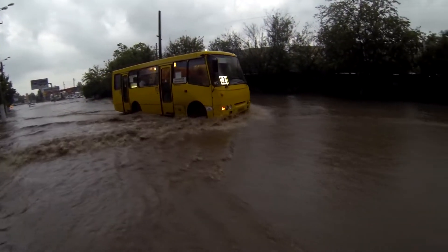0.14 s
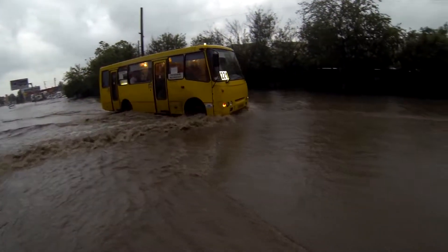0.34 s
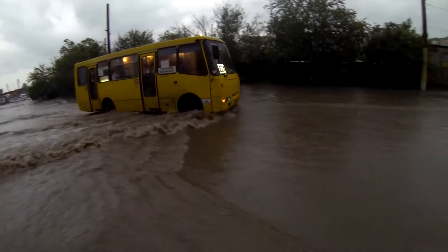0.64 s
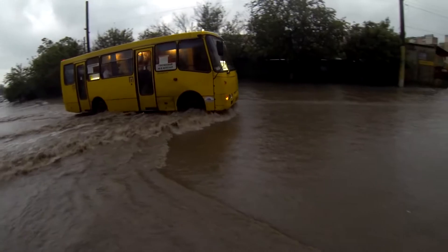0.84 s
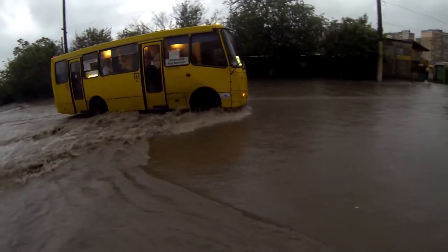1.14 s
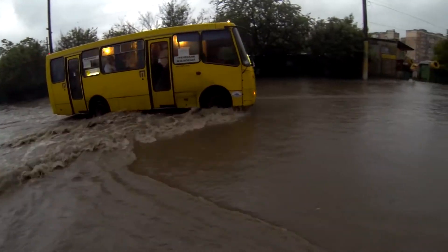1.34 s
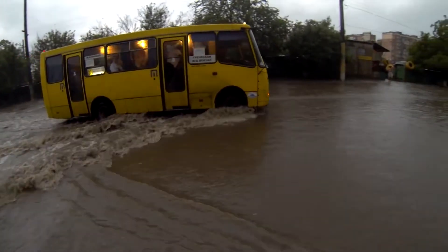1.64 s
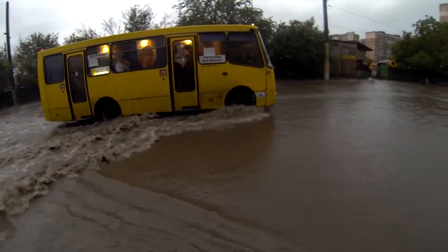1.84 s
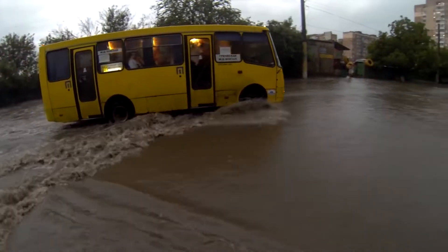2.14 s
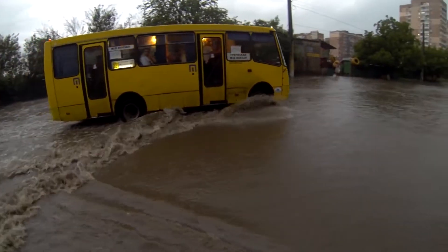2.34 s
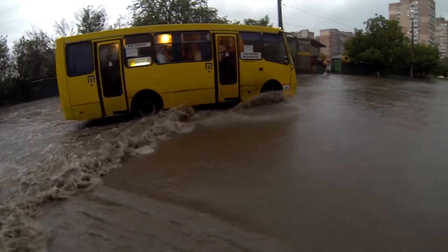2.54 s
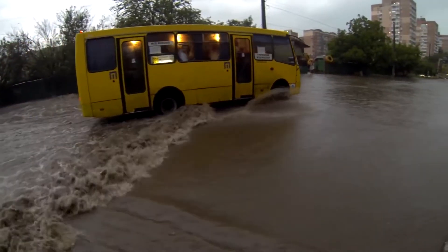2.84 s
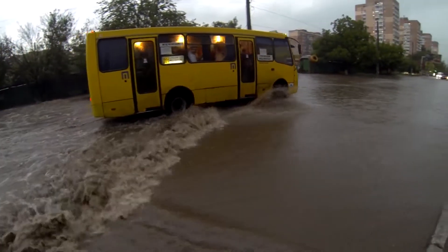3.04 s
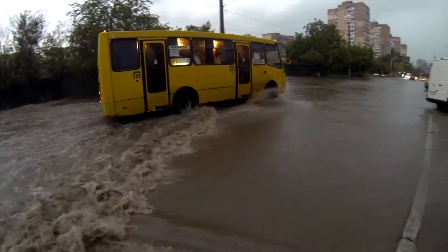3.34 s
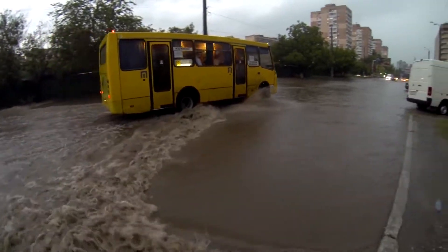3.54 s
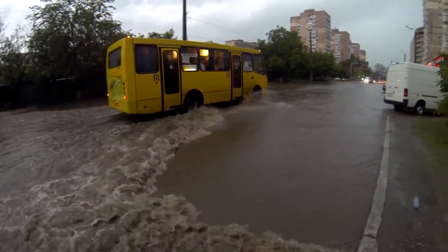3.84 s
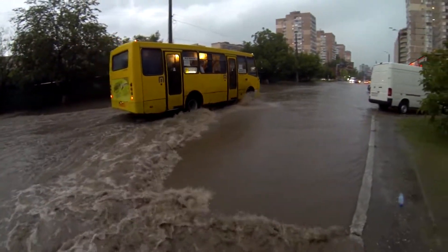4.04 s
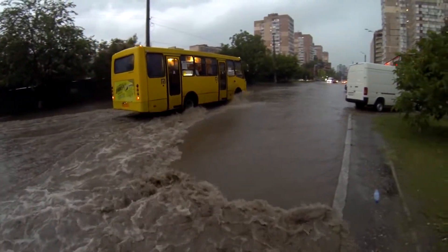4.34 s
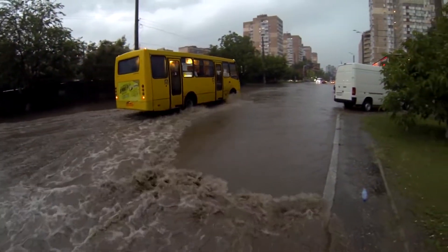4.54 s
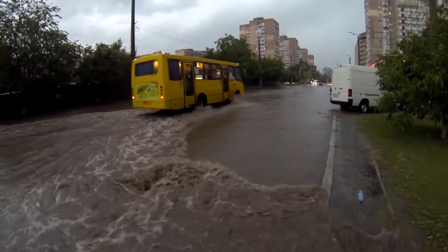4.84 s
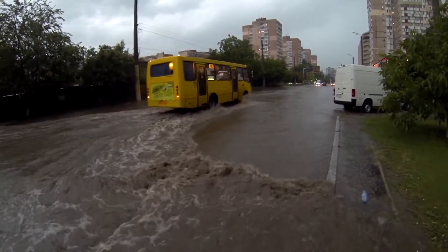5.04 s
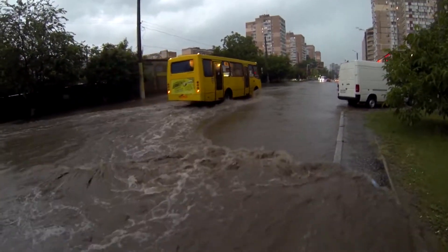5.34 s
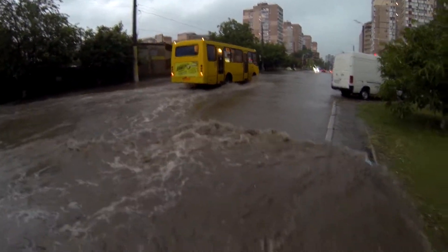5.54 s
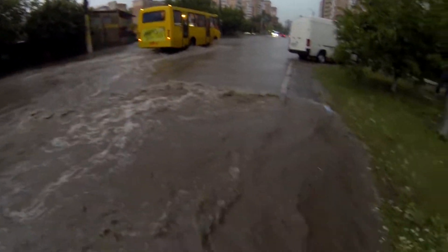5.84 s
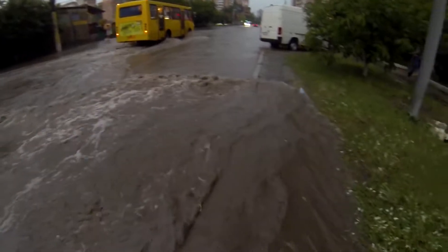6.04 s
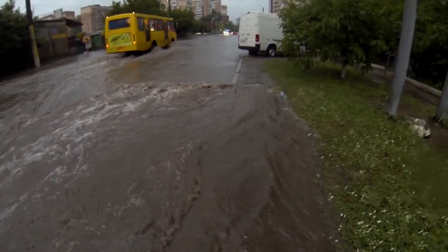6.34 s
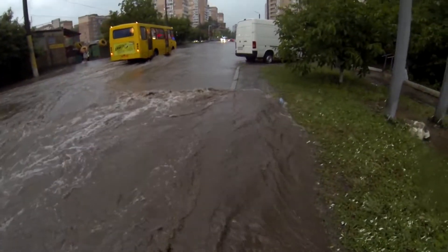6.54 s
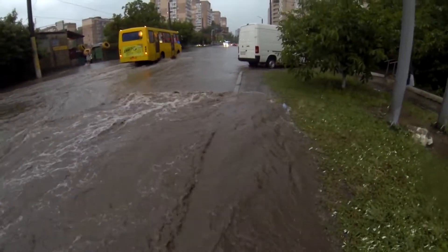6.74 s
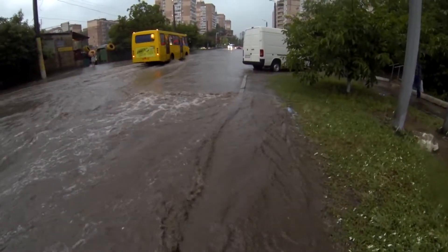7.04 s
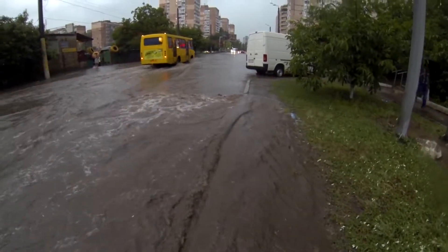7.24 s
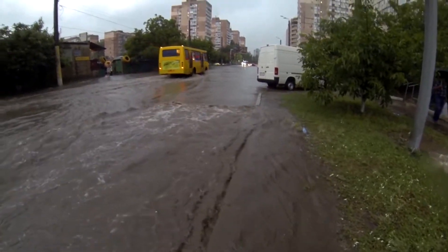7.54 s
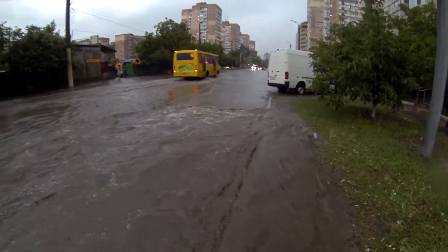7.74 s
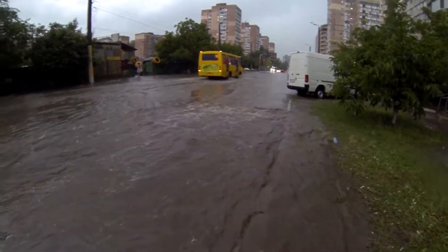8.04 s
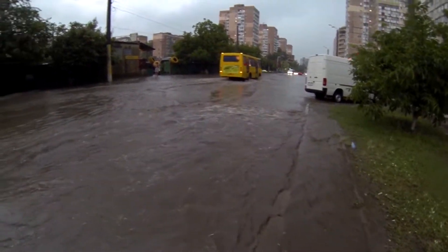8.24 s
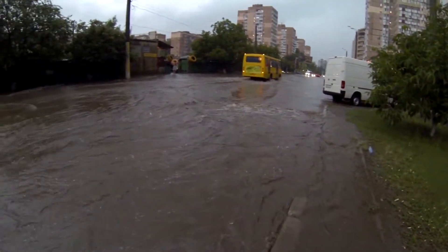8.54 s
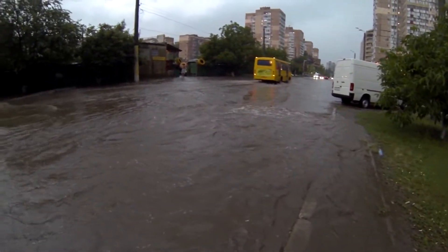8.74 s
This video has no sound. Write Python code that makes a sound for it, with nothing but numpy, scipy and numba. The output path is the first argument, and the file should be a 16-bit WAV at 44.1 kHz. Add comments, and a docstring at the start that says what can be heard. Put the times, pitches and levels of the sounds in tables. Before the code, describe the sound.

A flooded street in wet, windy weather, heard through a microphone in a hard housing. From 0 s water rushes in a continuous, slightly boxy wash with bubbling churn. A faint diesel hum lies underneath, with a very slight rising whine around 0.5-1.2 s. The rush and fine spray swell from 0.8 s, fullest around 2.5-3.2 s as the bus passes, then ease after 3.6 s and become a quieter, darker wash by 6 s, with a small renewed surge around 7.6 s. Low wind rumble and soft sub-bass thumps run throughout, strong near 1.5, 2.5 and 4 s, clustering from 5.5 s; dull flaps crowd 7.2-7.5 s and continue to about 8.5 s. Sharp raindrop clicks hit the housing at 1.4 and, loudest, 3.9 s, with lesser ones at 5.6, 7.1 and 7.7 s and tiny ticks between. It ends at 8.9 s in receding water.

```python
"""In a flooded street a bus ploughs past a microphone in a hard housing; its bow wave rushes up and spreads out.
The wake is filtered noise and gliding bubble tones, coloured by the resonances of the housing.
Raindrops strike the housing and set its modes ringing as damped sines.
Wind presses on the microphone port as band-passed noise and pulses, with damped swings for thumps and flaps.
Under the rush a diesel hums faintly: a firing tone with its octave, and a brief rising whine."""
import sys
import numpy as np
from scipy import signal
from scipy.fft import rfft, irfft, next_fast_len
from scipy.io import wavfile
from scipy.ndimage import uniform_filter1d
from numba import njit

SR = 44100
rng = np.random.default_rng(int(sys.argv[2]) if len(sys.argv) > 2 else 0)


def store_pcm(level_fs):
    """Save levels as 16-bit WAV."""
    pcm = np.round(np.clip(level_fs, -1, 1) * 32767).astype(np.int16)
    wavfile.write(sys.argv[1], SR, np.atleast_2d(pcm).T)


N = 392490

# resonances of the housing shell: centre_hz, width_hz, gain_db
HOUSING_MODES = [(1393, 246, -6), (1555, 182, 1), (1690, 193, 0.5), (2337, 90, 0.5), (2716, 510, -7.5),
                 (3100, 190, 0.5), (3720, 570, 3.5), (4220, 550, -0.5), (5360, 550, 9.5), (6560, 1240, 4),
                 (7950, 960, 4), (10230, 2900, -0.5), (11270, 530, 0.5), (13870, 1830, 15)]


def undb(db):
    """Decibels to amplitude ratio: 20 dB is a factor of ten."""
    return 10 ** (np.asarray(db) / 20)


def unit(x):
    """Normalisation to an rms of 1, so that a level in dB can then be applied."""
    return x / np.sqrt(np.mean(x ** 2))


def curves(table):
    """Linear interpolation in time: each column of a table becomes a curve."""
    time_s, *columns = np.transpose(table)
    return [np.interp(np.arange(N) / SR, time_s, column) for column in columns]


def resonance(x, hz, width_hz):
    """Simple resonator: a two-pole band-pass with gain 1 at the centre."""
    return signal.lfilter(*signal.iirpeak(hz, hz / width_hz, fs=SR), x)


def band(x, low_hz, high_hz, order=2):
    """Band limitation by a Butterworth band-pass."""
    return signal.sosfilt(signal.butter(order, (low_hz, high_hz), "bandpass", fs=SR, output="sos"), x)


def walk(rate_hz):
    """Slow random modulation: levels held for 1 / rate, slewed twice, with a spread near 1."""
    hold = int(SR / rate_hz)
    steps = np.repeat(rng.standard_normal(N // hold + 1), hold)
    slewed = uniform_filter1d(uniform_filter1d(steps, hold), hold)
    return 0.76 * slewed[:N]


def diesel(octave_db=-14, waver_db=-3.0):
    """Periodic combustion: a wavering firing tone with its octave, and a gear-like whine."""
    # firing tone: time_s, pitch_hz, level_db
    firing = [(0, 110, -58), (1.2, 108.1, -57), (1.7, 102.1, -53), (3, 106.1, -60), (4.4, 106.2, -62),
              (5.2, 103.6, -52), (6.5, 102.2, -79), (8.9, 100.7, -57)]
    # faint rising whine as the bus pulls through the turn: time_s, pitch_hz, level_db
    whine_track = [(0, 628, -75), (.3, 630, -77), (.48, 642, -53), (.62, 670, -65), (.72, 693, -63),
                   (.98, 714, -60), (1.2, 720, -64), (1.5, 740, -92)]

    firing_hz, firing_db = curves(firing)
    phase = 2 * np.pi * np.cumsum(firing_hz) / SR
    tone = np.sin(phase) * undb(waver_db * walk(4.1))
    tone = tone + undb(octave_db + waver_db * walk(2.5)) * np.sin(2 * phase)

    whine_hz, whine_db = curves(whine_track)
    wavering_hz = whine_hz * (1 + .006 * walk(12.9))
    whine = np.sin(2 * np.pi * np.cumsum(wavering_hz) / SR) * undb(whine_db + 5.2 * walk(20.5))
    # a sine of amplitude sqrt(2) has an rms of 1
    return np.sqrt(2) * (undb(firing_db) * tone + whine)


def wind(rumble_hz=(9.2, 27.2), drift_hz=(3.5, 11.0), drift_db=-5, gusty_db=2.5,
         eddies_per_s=140, eddy_db=5.0, flutter_hz=(33.5, 84), edge_hz=(128, 260), edge_db=-17, fitful_db=5.0):
    """Turbulent pressure: eddies make a deep rumble, and a flutter of separate shoves with sharper edges."""
    # wind on the port: time_s, rumble_db, flutter_db
    wind_levels = [(0, -29.5, -50), (.6, -37, -44.5), (1.3, -30, -44), (1.7, -34, -51),
                   (2.12, -32.5, -36.5), (2.35, -37, -49.5), (3.3, -32, -48.5), (3.55, -31.5, -41),
                   (4.2, -34.5, -45.5), (4.5, -36.5, -46), (4.8, -30.5, -38), (5.15, -29, -48.5),
                   (5.55, -24.5, -37.5), (5.9, -28, -45), (6.3, -28, -43), (6.62, -30.5, -51),
                   (7.1, -33.5, -44), (7.38, -25.5, -32), (7.65, -37, -39.5), (8.2, -30.5, -38.5),
                   (8.65, -30.5, -40.5), (8.9, -36.5, -47)]
    rumble_db, flutter_db = curves(wind_levels)
    gusts, fits = walk(30), walk(22)

    buffet, drift = rng.standard_normal((2, N))
    rumble = unit(band(buffet, *rumble_hz, order=3)) + undb(drift_db) * unit(band(drift, *drift_hz))

    chance, side, size = rng.random((3, N))
    # the sizes are exponentially spread in dB, with a ceiling
    strength = undb(np.minimum(-eddy_db * np.log(size), 11))
    shoves = (chance < eddies_per_s / SR) * np.sign(side - .5) * strength
    flutter = unit(band(shoves, *flutter_hz, order=3)) + undb(edge_db) * unit(band(shoves, *edge_hz))

    rumble = undb(rumble_db + gusty_db * gusts) * rumble
    return rumble + undb(flutter_db + fitful_db * fits) * flutter


def puffs(table, rise_cycles, delay_s):
    """Damped oscillation: each blow of air builds up, then swings the membrane as it decays."""
    out = np.zeros(N + SR)
    for time_s, peak_db, hz, t60_s in table:
        t = np.arange(int(2 * t60_s * SR)) / SR
        build_up = 1 - np.exp(-t * hz / rise_cycles)
        decay = 1000 ** (-t / t60_s)
        swing = build_up * decay * np.sin(2 * np.pi * hz * t)
        start = int((time_s + delay_s) * SR)
        out[start:][:len(t)] += undb(peak_db) * swing / np.abs(swing).max()
    return out[:N]


def thumps():
    """Impulsive wind pressure: gusts set the membrane swinging at low pitch."""
    # gust thumps, each begun a fixed delay after its time: time_s, peak_db, pitch_hz, t60_s
    gust_thumps = [(.1, -27, 26, 0.34), (.575, -19, 29, 0.23), (1.065, -25, 35.7, .1),
                   (1.375, -23, 50.4, 0.061), (1.465, -16.5, 40.4, 0.18), (1.983, -20.5, 52.6, 0.18),
                   (2.14, -22, 44.8, 0.12), (2.491, -13, 47, 0.11), (2.54, -19, 45, 0.083),
                   (3.605, -24, 45, 0.075), (4.006, -15, 51.3, 0.12), (4.36, -24, 30, 0.14),
                   (4.94, -19, 24, 0.3), (5.405, -27, 36, 0.11), (5.49, -19, 33, 0.24),
                   (5.675, -21, 38.4, 0.072), (6.07, -18, 30.2, 0.27), (6.25, -22, 31.6, 0.13),
                   (6.545, -21, 35.4, 0.12), (6.745, -19.5, 25.4, 0.24), (6.915, -24, 25.8, 0.17),
                   (7.05, -24, 45.6, 0.13), (7.199, -18, 35.6, 0.038), (7.319, -20.5, 39.5, .07),
                   (7.366, -24, 45, 0.055), (7.428, -18.5, 28.3, 0.16), (7.705, -20.5, 40, .1),
                   (8.43, -24, 36, .1), (8.67, -23.5, 24.8, 0.23)]
    return puffs(gust_thumps, rise_cycles=0.26, delay_s=0.0031)


def flaps(snap_t60_s=0.015, body_hz=95, body_t60_s=0.045):
    """Superposed damped oscillations: a quick snap rides on a slower heave of the membrane."""
    # flaps of air at the port, begun a fixed delay after their time: time_s, snap_db, snap_hz, body_db
    air_flaps = [(3.683, -30, 340, -46), (4.66, -45.5, 202, -30), (5.518, -42, 240, -29.5),
                 (5.832, -37, 280, -53), (6.179, -38, 242, -35), (6.318, -64, 200, -33),
                 (7.195, -43, 202, -34), (7.243, -30, 187, -23.5), (7.307, -41, 285, -29),
                 (7.383, -44, 240, -28), (7.438, -47, 234, -37), (7.547, -51, 208, -24),
                 (7.984, -46, 202, -27), (8.065, -41, 226, -31), (8.17, -55, 200, -29),
                 (8.238, -52, 242, -33), (8.388, -42, 215, -43), (8.494, -53, 261, -27)]
    snaps = [(time_s, snap_db, snap_hz, snap_t60_s) for time_s, snap_db, snap_hz, _ in air_flaps]
    bodies = [(time_s, body_db, body_hz, body_t60_s) for time_s, *_, body_db in air_flaps]
    heard_snaps = puffs(snaps, rise_cycles=0.38, delay_s=0.00474)
    return heard_snaps + puffs(bodies, rise_cycles=0.059, delay_s=0.00443)


def drops(low_fall_db_per_octave=55, reach_octaves=0.13, soft_hz=12000, stiff_share=0.6,
          rise_s=.00014, contact_damping=0.17, lead_rad=0.061, rebound_s=0.00274,
          rim_hz=4830, rim_width_hz=240, tick_hz=13200, tick_width_hz=900,
          linger_hz=3640, linger_width_hz=60, linger_db=-32,
          thud_hz=(230, 470, 860), thud_width_hz=(320, 360, 480), thud_tilt_db=(-5., -1., 6.)):
    """Modal excitation: a drop drives the shell while it flattens, then the modes ring out."""
    # raindrops; where one lands favours a low, a middle and a treble group of resonances: time_s,
    # low_hz, low_db, middle_hz, middle_db, middle_fall_db_per_octave,
    # treble_hz, treble_db, treble_fall_db_per_octave, rim_db, thud_db, tick_db,
    # contact_s, added_damping_hz, rebound_db (re the first blow, at 3 kHz)
    raindrops = [(1.4191, 1560, -1, 2530, -13, 16, 5330, -20.5, 7, -20.5, -15.5, -46, 0.00043, 60, -14),
                 (1.977, 1580, -38, 2350, -34, 42, 5000, -35, 10, -55, -52, -70, 0.0015, 90, -30),
                 (2.8296, 1500, -38, 2420, -38, 42, 4220, -34, 11, -50, -41, -70, 0.0019, 90, -30),
                 (3.8634, 1532, -3, 3047, -0.5, 42, 7040, -4.5, 38, -16, -21, -38, 0.0026, 120.4, -31),
                 (4.56, 1420, -39, 2350, -43, 42, 10000, -37, 20, -55, -35.5, -58, 0.0015, 90, -30),
                 (4.659, 1500, -42, 3650, -44, 42, 6000, -38, 10, -55, -50, -62, 0.0012, 90, -30),
                 (5.615, 1540, -23.5, 2440, -19.5, 33, 7950, -42, 17, -50, -57, -56, 0.0022, 90, -22),
                 (6.2962, 1540, -35, 2400, -50, 42, 5000, -62, 12, -65, -60, -75, 0.003, 90, -30),
                 (6.304, 1510, -31, 2400, -55, 42, 5000, -62, 12, -65, -62, -75, 0.004, 90, -30),
                 (6.353, 1530, -34.5, 2400, -55, 42, 5000, -62, 12, -65, -62, -75, 0.004, 90, -30),
                 (7.118, 1375, -15, 3030, -16.5, 55, 7500, -27.5, 44, -34, -51, -52, 0.002, 240, -28),
                 (7.6609, 1500, -16.5, 2190, -10.5, 39, 6650, -23, 34, -44, -36, -46, 0.0021, 240.7, -22),
                 (7.851, 1500, -46, 3600, -42, 25, 6000, -50, 12, -55, -65, -75, 0.0015, 90, -30),
                 (7.877, 1550, -36, 2700, -43, 25, 5000, -56, 12, -65, -65, -75, 0.002, 90, -30),
                 (7.888, 1550, -43, 3000, -41, 25, 6000, -54, 12, -65, -65, -75, 0.002, 90, -30),
                 (8.048, 1570, -35, 2400, -60, 42, 5000, -65, 12, -65, -60, -75, 0.004, 90, -30),
                 (8.1375, 1570, -42, 3100, -56, 42, 9500, -47, 18, -60, -53, -65, .0014, 90, -30)]
    heard = np.zeros(N + SR)
    t = np.arange(2048) / SR
    pad = 64  # samples ahead of the blow, room for the two-way filter
    rebound = pad + int(rebound_s * SR)
    mode_hz, mode_width_hz, _ = np.transpose(HOUSING_MODES)

    for time_s, low_hz, low_db, *groups, rim_db, thud_db, tick_db, contact_s, damp_hz, rebound_db in raindrops:
        shell, thud = np.zeros((2, 2 * len(t) + pad))
        all_groups = np.reshape([low_hz, low_db, low_fall_db_per_octave, *groups], (-1, 3))
        centre_hz, top_db, fall_db = all_groups.T
        # each mode rings by its nearness to the favoured groups
        octaves = np.log2(centre_hz / mode_hz[:, None])
        gains = np.linalg.norm(undb(top_db - fall_db * np.abs(octaves)), axis=1)
        # a soft drop hardly stirs the highest resonances
        gains = gains / (1 + (mode_hz / soft_hz) ** 4)
        # the water on the shell damps it and draws the nearest resonances toward the favoured pitches
        pull_octaves = np.sum(octaves * np.exp(-(octaves / reach_octaves) ** 2), axis=1)
        drawn_hz = mode_hz * 2 ** pull_octaves

        modes = [(shell, *mode) for mode in zip(drawn_hz, mode_width_hz + damp_hz, gains)]
        modes += [(shell, rim_hz, rim_width_hz, undb(rim_db))]
        modes += [(shell, tick_hz, tick_width_hz, undb(tick_db))]
        # one narrow resonance lingers after the others, its level set by the middle group
        modes += [(shell, linger_hz, linger_width_hz, undb(top_db[1] + linger_db))]
        modes += [(thud, hz, width_hz, undb(thud_db + tilt_db))
                  for hz, width_hz, tilt_db in zip(thud_hz, thud_width_hz, thud_tilt_db)]

        chance = rng.standard_normal((len(modes), 2))
        # during contact the decay runs at only a share of its later rate
        decay_time = t - (1 - contact_damping) * np.minimum(t, contact_s)
        rise = 1 - np.exp(-(t / rise_s) ** 2)
        for (out, hz, width_hz, gain), (detune, slip) in zip(modes, chance):
            envelope = rise * np.exp(-np.pi * width_hz * decay_time)
            # higher resonances start less in step
            phase = 2 * np.pi * hz * (1 + 0.008 * detune) * t + lead_rad + slip * hz / 20000
            ring = gain * envelope * np.sin(phase)
            # the shell is first pushed inward, hence the minus sign
            out[pad:][:len(t)] -= ring
            # a smaller droplet falls back: a second, brighter tick
            out[rebound:][:len(t)] -= ring * min(undb(rebound_db) * np.sqrt(hz / 3000), 1)

        # below the low group the stiff shell stays quiet
        stiff = signal.butter(2, stiff_share * low_hz, "high", fs=SR)
        heard[int(time_s * SR) - pad:][:len(thud)] += signal.filtfilt(*stiff, shell) + thud
    return heard[:N]


def housing(x, direct_db=-2, direct_hz=1100):
    """Modal transmission: the shell passes the bass and rings at its resonances; between them they cancel."""
    direct = undb(direct_db) * signal.lfilter(*signal.butter(1, direct_hz, fs=SR), x)
    return direct + sum(undb(db) * resonance(x, hz, width_hz) for hz, width_hz, db in HOUSING_MODES)


@njit
def grains(start, hz, cycles, size, glide, n, sr):
    """Bubble resonance: damped sines that glide upward, as bubbles do when they near the surface."""
    out = np.zeros(n)
    for g in range(len(start)):
        length = int(cycles[g] * sr / hz[g])
        phase = 0.
        for i in range(min(3 * length, n - start[g])):
            phase += 2 * np.pi * hz[g] * (1 + glide * i / length) / sr
            out[start[g] + i] += size[g] * np.exp(-2 * i / length) * np.sin(phase)
    return out


def wake(bubble_count=30000, bubble_db=-12, scatter_db=1.0, slosh_db=0.73, flicker_db=1.1, splash_db=1.18):
    """Turbulent water: hiss and a crowd of bubbles, in bands that slosh together and flicker alone."""
    # the wake: time_s, rush_db, churn_db
    wake_levels = [(0, -44.5, -47), (.35, -44, -47.5), (.82, -40.5, -45.5), (1.3, -40.5, -46.5),
                   (2.35, -39.5, -47), (2.52, -39.5, -46.5), (2.73, -39, -44), (3.2, -39.5, -44.5),
                   (3.64, -42, -46), (4.1, -44, -47.5), (4.59, -43.5, -48.5), (4.95, -45.5, -50),
                   (6.15, -48, -53), (6.32, -47, -51), (6.5, -47, -52), (7.1, -46.5, -53.5),
                   (7.35, -44.5, -54), (7.6, -42.5, -51.5), (8.0, -47.5, -55), (8.9, -47.5, -54.5)]
    # fine spray hiss, which swells as the bus comes abreast and then fades: time_s, level_db
    spray_levels = [(0.0, -55.5), (0.45, -55), (0.79, -53), (1.83, -52), (3.02, -50), (4.04, -55),
                    (6.72, -61), (7.46, -59.5), (8.9, -62)]
    # spectral density of the water before the housing: frequency_hz, relative_db
    water_spectrum = [(120, 2), (300, -5), (700, -2), (1500, -4.5), (3000, -15), (6000, -23.5),
                      (9000, -30.5), (12000, -38.5), (15000, -56.5)]
    rush_db, churn_db = curves(wake_levels)
    spray_db, = curves(spray_levels)

    when, pitch, strength, duration = rng.random((bubble_count, 4)).T
    bubble_hz = 300 * 30 ** pitch
    # higher bubbles are shorter, so they are struck harder to keep the crowd's spectrum flat
    size = undb(np.minimum(-scatter_db * np.log(strength), 9)) * bubble_hz / 1000
    start = (when * N).astype(np.int64)
    bubbles = grains(start, bubble_hz, 2 + 5 * duration, size, 0.26, N, SR)
    water = rng.standard_normal(N) + undb(bubble_db) * unit(bubbles)

    length = next_fast_len(N)
    spectrum = rfft(water, length)
    octave = np.log2(np.arange(len(spectrum)) * SR / length + 1)  # octaves above 1 Hz
    table_hz, table_db = np.transpose(water_spectrum)
    spectrum *= undb(np.interp(octave, np.log2(table_hz), table_db))

    slosh, splash = walk(8.8), walk(30)
    parts = np.zeros((3, N))  # churn, rush, spray, from low to high
    # overlapping bands half an octave apart; those above 1 kHz also splash
    for centre in np.arange(6, 14.6, .5):
        mask = np.cos(np.pi * np.clip(octave - centre, -.5, .5)) ** 2
        sway_db = slosh_db * slosh + flicker_db * walk(14) + splash_db * splash * (centre > 10)
        part = int(centre > 9.9) + int(centre > 11.6)
        parts[part] += undb(sway_db) * irfft(spectrum * mask, length)[:N]

    churn, rush, spray = (unit(housing(part)) for part in parts)
    return undb(churn_db) * churn + undb(rush_db) * rush + undb(spray_db) * spray


def scene():
    """Linear superposition of all sources on one channel."""
    return (wake() + wind() + thumps() + flaps() + drops() + diesel())[None]


def record(dry, ceiling=.94, top_hz=15250):
    """Saturation and band limit: the converter rounds off peaks near full scale; the top is cut."""
    soft = dry / (1 + np.abs(dry / ceiling) ** 5) ** .2
    return signal.sosfilt(signal.ellip(10, .2, 80, top_hz, fs=SR, output="sos"), soft)


dry = scene()
out = record(dry)
store_pcm(out)
```